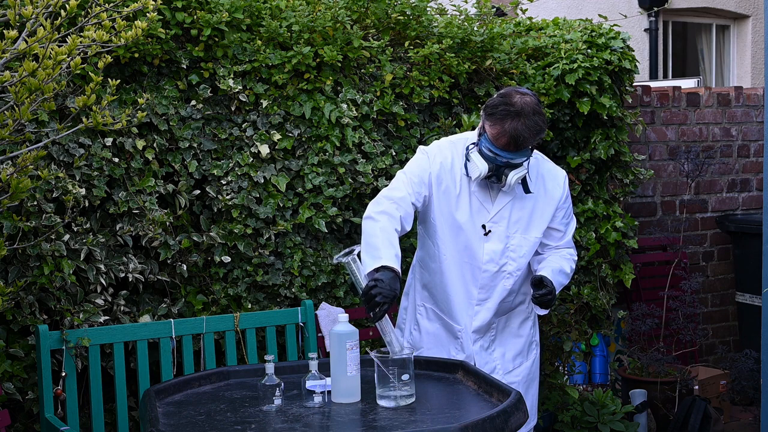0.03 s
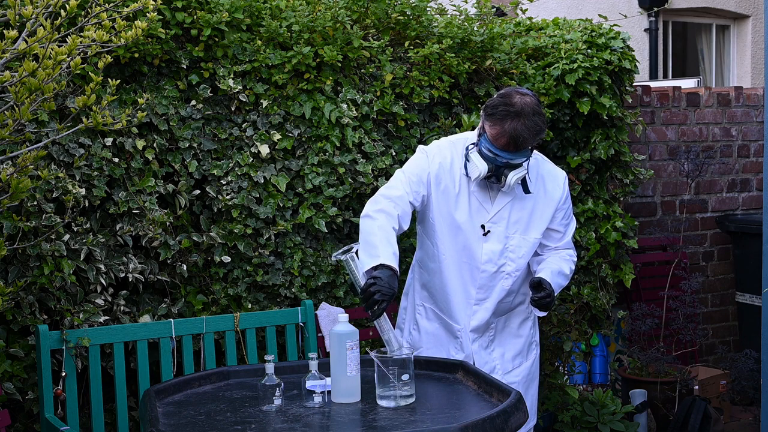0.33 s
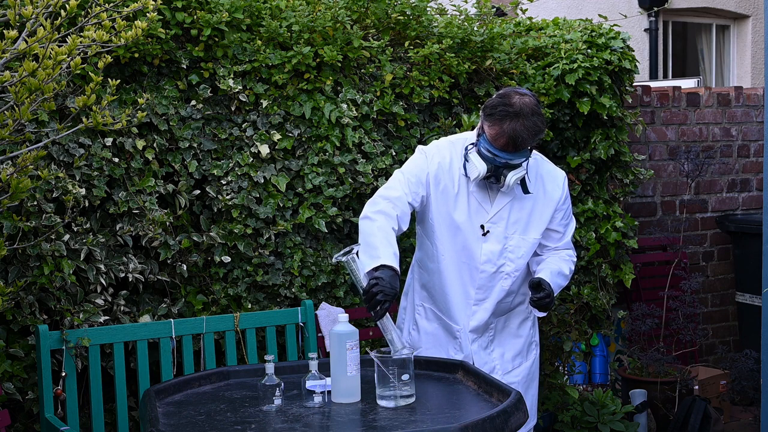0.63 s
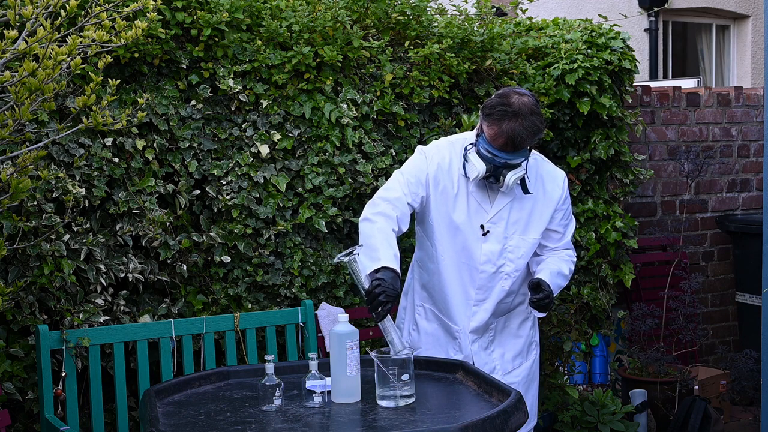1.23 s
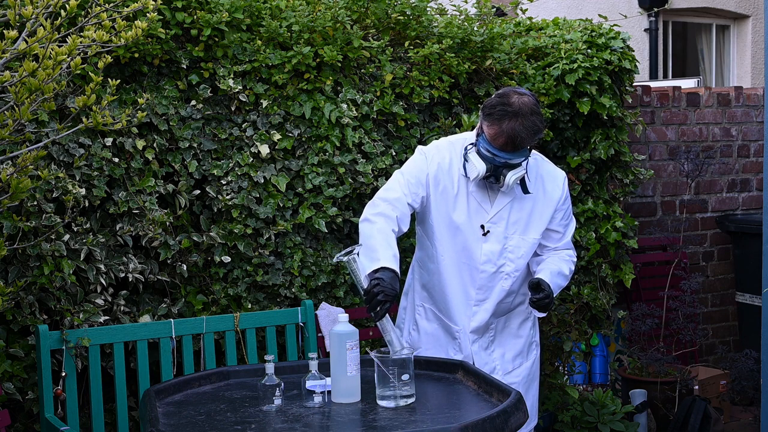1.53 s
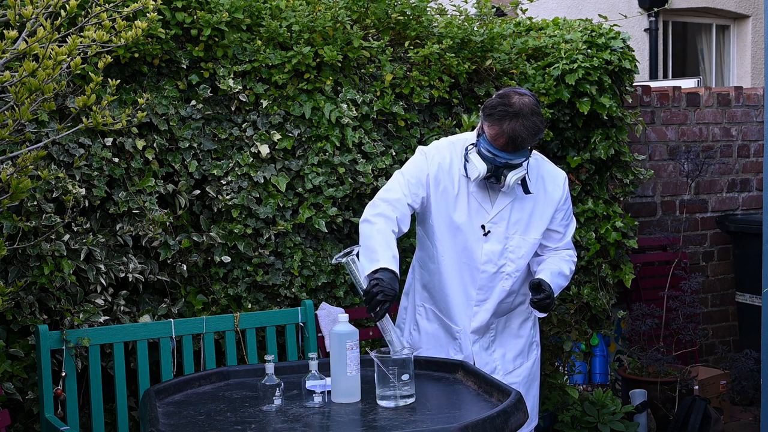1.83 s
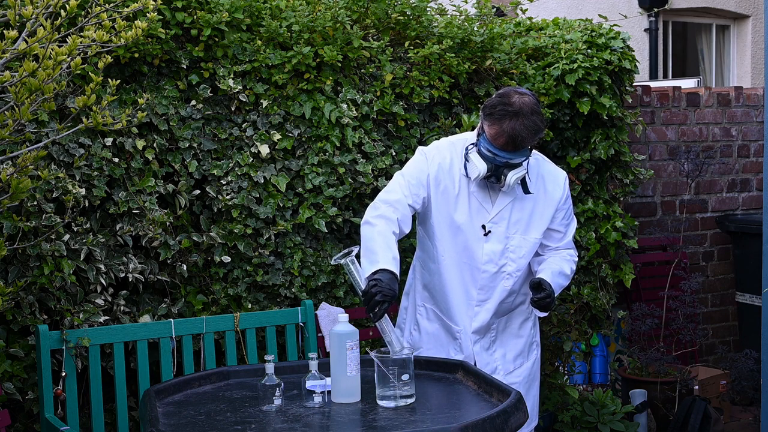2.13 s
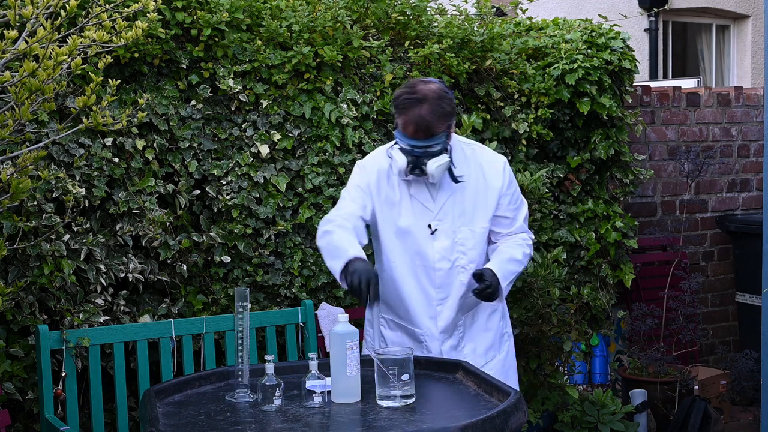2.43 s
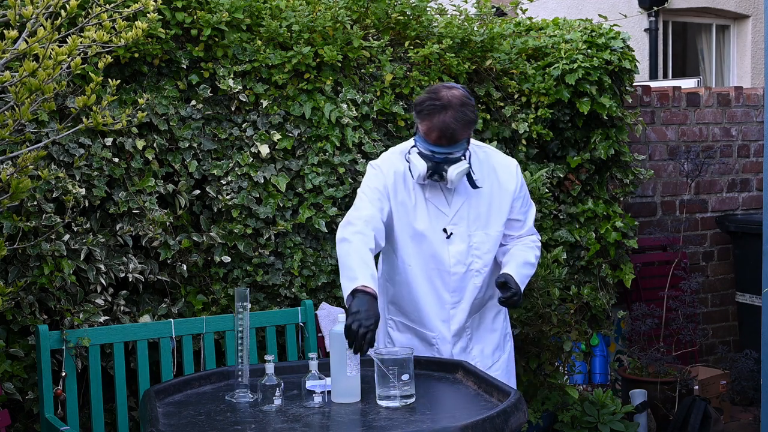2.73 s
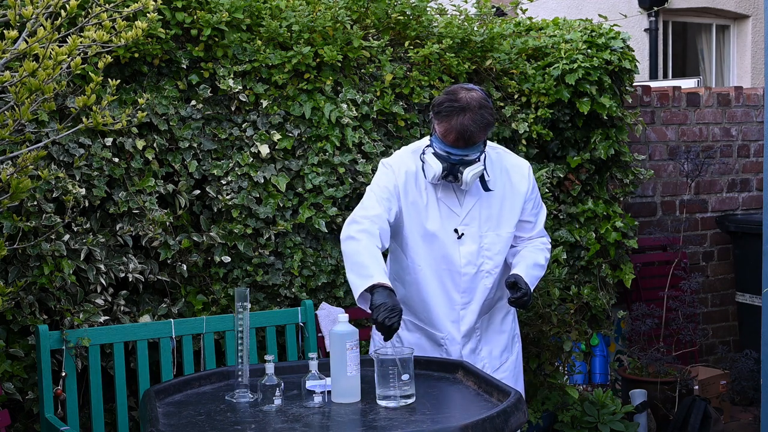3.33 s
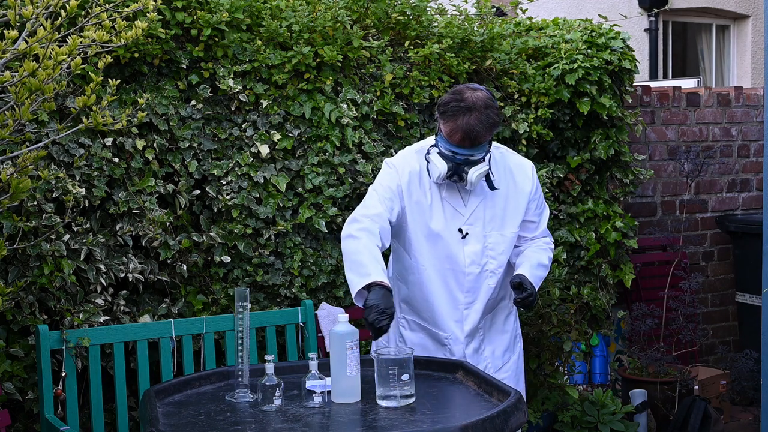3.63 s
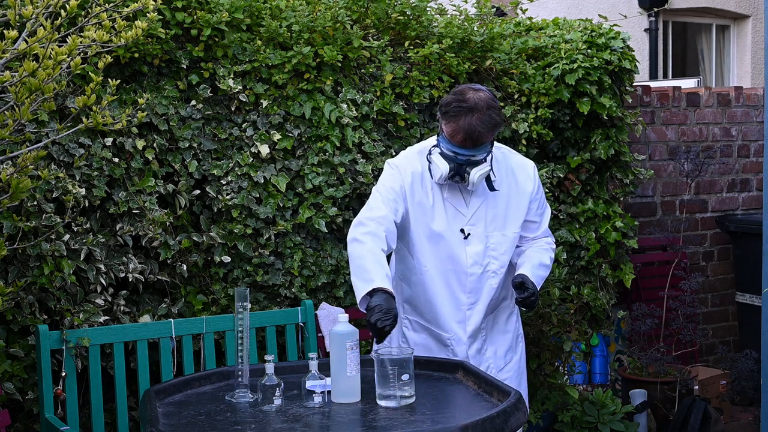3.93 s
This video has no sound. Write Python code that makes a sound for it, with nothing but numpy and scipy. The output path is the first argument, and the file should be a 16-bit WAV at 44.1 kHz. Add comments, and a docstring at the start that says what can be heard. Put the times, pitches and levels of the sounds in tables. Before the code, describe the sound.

A glass rod clinks against a beaker several times after faint coat rustling outdoors.

```python
"""A lab coat rustles close by and glassware ticks in a gloved hand, over the low rumble and hiss of a
quiet garden. After three seconds a glass rod, lowered into a beaker, clinks five times, mostly with a
bounce. Each impact sets both glasses in free vibration, their modes weighted by the point of contact.
Between blows the rod grazes the wall, and friction keeps both faintly ringing. Nearby surfaces scatter
the sound of the glass."""
import sys
import numpy as np
from scipy import signal
from scipy.fft import rfft, irfft
from scipy.io import wavfile
from scipy.ndimage import uniform_filter1d

SR = 44100
rng = np.random.default_rng(int(sys.argv[2]) if len(sys.argv) > 2 else 0)


def bounce(signal):
    """Save signal as a 16-bit WAV file at the path given by the first command-line argument."""
    frames = np.transpose(np.atleast_2d(signal))
    limited = np.clip(frames, -1, 1)
    pcm = np.round(limited * 32767).astype(np.int16)
    wavfile.write(sys.argv[1], SR, pcm)


N = 176400

# beaker modes, one per column; rows: pitch_hz, foot_db, wall_db, rim_db (places 0, 1, 2), t60_s
BEAKER_MODES = [
    [745, 1991, 2035, 3467, 3771, 4000, 4200, 4492, 4607, 5216, 6020, 6266, 6480, 6635, 6790, 8365, 10770,
     12215, 12420, 14560],
    [-62, -47, -48, -50, -29.5, -38, -38, -40, -35, -39, -33, -43, -31, -25, -46, -28, -60, -56, -52, -46],
    [-59, -45, -51, -43, -31, -35, -35, -45, -30.5, -54, -34, -43, -31, -24.5, -45, -39, -30, -34, -41, -34],
    [-62, -45, -51, -44, -52, -48, -46, -39, -46, -45, -46, -52, -46, -46, -52, -32, -40, -29, -38, -36],
    [1.8, .72, .15, .21, .175, .035, .035, .16, .125, .18, .04, .13, .03, .03, .12, .055, .07, .07, .06,
     .055],
]
# rod modes, one per column; rows: pitch_hz, tip_db, shaft_db (places 0, 1), t60_s
ROD_MODES = [
    [1529, 2955, 3185, 4518, 4620, 4678, 4930, 5080, 5221, 7090, 7400, 7685, 9522, 9718, 9800, 11322, 11420,
     11915, 12600, 13100, 13540, 14300],
    [-60, -44.5, -62, -43, -42, -40, -38, -44, -57, -45, -36, -45, -43, -34, -36, -54, -35, -43, -42, -44,
     -38, -35],
    [-57, -45, -62, -36, -54, -41, -42, -40, -43, -56, -52, -36, -30, -34, -42, -34, -34, -37, -54, -35,
     -40, -48],
    [.28, .175, .35, .13, .11, .125, .105, .04, .11, .07, .065, .05, .055, .04, .055, .06, .04, .06, .07,
     .025, .045, .045],
]
# points at which the colour of a contact is set: frequency_hz
COLOUR_HZ = [1500, 3000, 4700, 7000, 10000, 13500]
# impacts of rod on beaker: start_s, contact_s, beaker_place, rod_place, beaker_db, rod_db, crack_db,
# knock_db, then one colour_db for each of COLOUR_HZ
IMPACTS = [(3.0340, 0.0015, 1.8, 0, -17, -3, -7, -1, -4.5, 2, -6.5, -2.5, 3, -8.5),
           (3.2623, 0.0012, 0.75, 1, -9.5, -0.5, 0, 4.5, -8.5, 2, 1, 7, 7, 7),
           (3.2820, 0.0018, 0, 1, -17, -3.5, -9, -2, -9, 6, -5.5, -1, 5, -6),
           (3.2870, 0.0024, 0, 1, -17.5, -18, -5, -19, 6, -1.5, -2, 7, -4, -8),
           (3.6296, 0.0015, 0.11, 0, -24, -3.5, -8, -.5, 9, 1.5, 2.5, 7.5, -33, -24),
           (3.6349, 0.00064, 2.4, 0, -36, -19, -13, -5, -4, -5, 7, -4, -22, -23),
           (3.694, 0.0022, 1, .6, 1.5, -9.5, 6, 3.5, -2.5, 1, 1.5, 7, -3.5, -7.5),
           (3.8822, 0.00057, 2.3, .6, -11.5, -17.5, -7, -4, 2, -2, 4, 3, 4, 2),
           (3.8975, 0.0024, 2.1, .6, -15.5, -16, -13, -8, -6, -4, 6, 9, 1.5, 6)]
# dense, short overtones of the contact: frequency_hz, density_db
CRACK_SPECTRUM = [(300, -35), (1000, -25), (1600, -9.5), (2400, -5.5), (3200, 1.5), (4200, -15), (5500, -1),
                  (6600, 3.5), (10000, 0.5), (13500, 7.5), (15000, 3), (16500, -31)]
CRACK_DB, CRACK_T60_S = -30, 0.027
BITE_DB, BITE_T60_S = -24, 0.006  # the first hard instant of the crack
OVERTONE_DB, OVERTONE_T60_S, OVERTONE_SPREAD_DB = -57, 0.06, 4
OVERTONE_RANGE_HZ = (6800, 16000)
# dull knock passed on to the table: frequency_hz, density_db
KNOCK_SPECTRUM = [(100, -28), (350, -13), (550, 4.5), (750, -8), (1080, 2.5), (1400, -14), (3000, -9)]
KNOCK_DB, KNOCK_T60_S = -41.5, 0.04

# the rod catches on the wall: start_s, length_s, rasp_db, fizz_db
CATCHES = [(3.125, 0.023, -74.5, -80), (3.354, 0.039, -82, -81), (3.417, 0.012, -60.5, -62.5),
           (3.445, 0.056, -76.5, -80), (3.496, 0.0079, -67.5, -68), (3.512, .012, -75, -60),
           (3.538, 0.024, -79, -73.5), (3.588, 0.02, -63, -82), (3.612, 0.0079, -69.5, -66),
           (3.64, 0.055, -69, -67.5), (3.993, 0.027, -65, -70)]
# rasp of a catch: frequency_hz, density_db
RASP_SPECTRUM = [(1500, -26), (3000, -13), (3800, 0), (4650, 12), (5800, -9), (7400, 9), (8700, -10),
                 (10000, 5.5), (13000, -15), (15500, -22.5)]
# high fizz of a catch: frequency_hz, density_db
FIZZ_SPECTRUM = [(5000, -32), (9000, -5), (11500, -4), (12600, 3), (14000, -11.5), (15500, -18)]
# the rod drags round the wall: time_s, level_db
DRAG_LEVELS = [(3.28, -110), (3.35, -83), (3.43, -74), (3.52, -82.5), (3.6, -73), (3.68, -79), (3.75, -110)]
# sliding friction: frequency_hz, density_db
DRAG_SPECTRUM = [(1500, -5.5), (3700, -10), (4600, -1), (6000, -8), (15000, -14.5)]
GRAZE_GRAIN_DB, GRAZE_RING_DB = 3, -6.5

SCATTER_DB, SCATTER_T60_S = -15, 0.16
# stereo width of the clinks' tail, narrow in the mids and wide in the treble: frequency_hz, gain_db
TAIL_WIDTH = [(1000, -25), (2200, -32), (3500, -23), (4800, -1.5), (12000, 2)]
TAIL_WIDTH_DB = -24

# ticks of handled glassware: start_s, body_db, snap_db
TICKS = [(.166, -65, -67), (0.2647, -57, -69), (.563, -66, -80), (0.712, -71, -69), (0.9716, -55, -62),
         (1.872, -54, -72), (2.845, -61, -63)]
# hollow body of a tick: frequency_hz, density_db
TICK_BODY_SPECTRUM = [(200, 0), (600, 0), (1100, 5), (1900, -5), (2700, -12), (4000, -15), (9000, -32)]
# thin snap of a tick: frequency_hz, density_db
TICK_SNAP_SPECTRUM = [(1000, -14), (2600, 1), (4000, -1), (5500, -4), (7500, -13), (15000, -28)]
TICK_S = 0.0048

# creases of coat and glove: start_s, length_s, crease_db, thump_db
CREASES = [(0.062, 0.059, -65.5, -81), (0.204, 0.027, -68.5, -68), (0.225, 0.031, -66.5, -65),
           (0.26, 0.0062, -72, -56), (0.549, 0.049, -64.5, -63.5), (0.864, 0.029, -67, -64),
           (1.009, 0.036, -70, -65), (1.151, 0.025, -62, -81), (1.278, 0.036, -66, -57),
           (1.591, 0.013, -70, -84), (1.85, 0.021, -67, -66), (2.142, 0.067, -68.5, -70),
           (2.332, 0.028, -67, -65), (2.841, 0.016, -62, -55)]
# creasing cloth: frequency_hz, density_db
CREASE_SPECTRUM = [(100, -8), (400, 1.5), (900, -0.5), (1450, 1), (2100, -3.5), (3000, -10.5),
                   (5000, -18.5), (9000, -26), (15000, -32)]
# soft thump of cloth: frequency_hz, density_db
THUMP_SPECTRUM = [(50, -17), (110, -5), (165, 2.5), (300, -5.5), (800, -23), (3000, -39)]
# the sleeve swishes as the arm moves: time_s, level_db
SLEEVE_LEVELS = [(2.407, -91), (2.412, -55.5), (2.53, -55.5), (2.6, -58), (2.665, -57), (2.7, -64),
                 (2.8, -68.5), (3.0, -76)]
# swish of the sleeve: frequency_hz, density_db
SLEEVE_SPECTRUM = [(40, -14), (130, -4.5), (330, -5), (480, -1), (850, 0), (1150, -10), (2500, -13),
                   (4500, -18), (10000, -27.5), (12500, -29), (16000, -46)]
CLOTH_GRAIN_DB = 2

# soft rush in the background: time_s, level_db
RUSH_LEVELS = [(2.0, -90), (2.4, -82), (2.7, -66), (2.95, -77), (3.15, -67.5), (3.3, -65.5), (3.55, -65.5),
               (3.7, -74), (3.85, -74.5), (4.0, -63.5)]
# low-mid colour of that rush: frequency_hz, density_db
RUSH_SPECTRUM = [(150, -30.5), (400, 5), (800, 1.5), (1300, -14), (3000, -12), (8000, -30)]
# outdoor rumble and hiss: frequency_hz, density_db
AIR_SPECTRUM = [(12, -28.5), (20, -6), (37, -5), (68, -3.5), (142, -3), (204, -2.5), (234, -3.5), (472, -7),
                (542, -9.5), (590, -10), (738, -9.5), (1370, -17), (2750, -24), (12100, -32),
                (16000, -53.5)]
# stereo width of the rumble and hiss: frequency_hz, density_db
AIR_SIDE_SPECTRUM = [(40, 4), (170, -11), (900, -9.5), (1500, -2.5), (7500, -0.5), (11000, -27),
                     (16000, -20)]
AIR_DB, AIR_SIDE_DB, AIR_WANDER_DB = -63.5, -86.5, 0.6

SIDES = np.array([[1], [-1]])  # sign of a difference signal, left and right
MIC_LAG_S, CUTOFF_HZ = 5e-6, 16100


def clinks(t):
    """Impact excitation: each blow rings beaker and rod, cracks at the contact and knocks the table."""
    out = np.zeros(N)
    for start, contact_s, beaker_place, rod_place, *levels in IMPACTS:
        beaker_db, rod_db, crack_db, knock_db, *colour = levels
        first = int(start * SR)
        age = t[:N - first]
        beaker = undb(beaker_db) * ring(age, BEAKER_MODES, beaker_place, colour)
        rod = undb(rod_db) * ring(age, ROD_MODES, rod_place, colour)
        decay = undb(CRACK_DB) * fade(age, CRACK_T60_S) + undb(BITE_DB) * fade(age, BITE_T60_S)
        burst = decay * tint(noise(CRACK_SPECTRUM), COLOUR_HZ, colour)[:len(age)]
        crack = undb(crack_db) * (burst + ring(age, overtones(count=50), 0, colour))
        knock = undb(KNOCK_DB + knock_db) * fade(age, KNOCK_T60_S) * noise(KNOCK_SPECTRUM)[:len(age)]
        onset = np.minimum(age / contact_s, 1)
        out[first:] += (beaker + rod + crack + knock) * onset
    return out


def ring(t, modes, place, colour):
    """Modal superposition: damped sinusoids add, weighted by the place and colour of the contact."""
    out = np.zeros(len(t))
    for (hz, *levels, t60), phase in zip(zip(*modes), rng.random(len(modes[0]))):
        age = t[:int(2 * t60 * SR)]
        place_db = np.interp(place, np.arange(len(levels)), levels)
        colour_db = np.interp(np.log(hz), np.log(COLOUR_HZ), colour)
        envelope = undb(place_db + colour_db) * fade(age, t60)
        out[:len(age)] += envelope * np.sin(2 * np.pi * (hz * age + phase))
    return out


def overtones(count):
    """High modal density: weak, short modes lie among the main ones, drawn at random for each blow."""
    hz = rng.uniform(*OVERTONE_RANGE_HZ, count)
    db = OVERTONE_DB + np.interp(hz, *np.array(CRACK_SPECTRUM).T)
    db += OVERTONE_SPREAD_DB * rng.standard_normal(count)
    t60 = OVERTONE_T60_S * 2 ** rng.uniform(-0.5, 0.31, count)
    return hz, db, t60


def grazes(t):
    """Forced vibration: friction drives both glasses, and rasps and fizzes where the rod catches."""
    start, length, rasp_db, fizz_db = np.array(CATCHES).T
    grain = undb(GRAZE_GRAIN_DB * wander(rate_hz=600))
    rasp = swells(t, start, length, rasp_db) * noise(RASP_SPECTRUM) * grain
    fizz = swells(t, start, length, fizz_db) * noise(FIZZ_SPECTRUM) * grain
    drag = curve(t, DRAG_LEVELS) * noise(DRAG_SPECTRUM) * grain
    flat = np.zeros(len(COLOUR_HZ))
    response = ring(t, BEAKER_MODES, 0, flat) + ring(t, ROD_MODES, 1, flat)  # foot and shaft
    friction = undb(GRAZE_RING_DB) * rasp + drag
    ringing = signal.fftconvolve(friction, response / np.linalg.norm(response))[:N]
    return rasp + fizz + ringing


def scatter(x, t):
    """Diffuse reflection: table, coat and hedge return a short, decaying spray of echoes."""
    echoes = (rng.standard_normal(N) * fade(t, SCATTER_T60_S))[:SR // 2]
    return signal.fftconvolve(x, echoes / np.linalg.norm(echoes))[:N]


def ticks(t):
    """Brief transients are broadband: handled glassware ticks with a hollow body and a thin snap."""
    start, body_db, snap_db = np.array(TICKS).T
    length = np.full(len(start), TICK_S)
    body = swells(t, start, length, body_db) * noise(TICK_BODY_SPECTRUM)
    snap = swells(t, start, length, snap_db) * noise(TICK_SNAP_SPECTRUM)
    return body + snap


def coat(t):
    """Buckling and friction: cloth creases, at times with a soft thump, and the sleeve swishes once."""
    start, length, crease_db, thump_db = np.array(CREASES).T
    creases = swells(t, start, length, crease_db) * noise(CREASE_SPECTRUM)
    swish = curve(t, SLEEVE_LEVELS) * noise(SLEEVE_SPECTRUM)
    grain = undb(CLOTH_GRAIN_DB * wander(rate_hz=350))
    thumps = swells(t, start, length, thump_db) * noise(THUMP_SPECTRUM)
    return (creases + swish) * grain + thumps


def outdoors(t):
    """Ambient noise, highly correlated left and right: rumble, hiss and a soft rush that swells later."""
    air = undb(AIR_DB + AIR_WANDER_DB * wander(rate_hz=12)) * noise(AIR_SPECTRUM)
    rush = curve(t, RUSH_LEVELS) * noise(RUSH_SPECTRUM)
    width = undb(AIR_SIDE_DB) * noise(AIR_SIDE_SPECTRUM)
    return air + rush + width * SIDES


def undb(db):
    """Amplitude ratio of a level in decibels."""
    return 10 ** (np.asarray(db) / 20)


def noise(spectrum):
    """Filtered white noise of rms 1; the spectrum sets only its shape."""
    x = tint(rng.standard_normal(N), *np.array(spectrum).T)
    return x / x.std()


def tint(x, hz, db):
    """Zero-phase filtering, with the gain interpolated over log frequency."""
    bin_hz = np.maximum(np.fft.rfftfreq(N, 1 / SR), 1)
    gain = undb(np.interp(np.log(bin_hz), np.log(hz), db))
    return irfft(rfft(x) * gain, N)


def wander(rate_hz):
    """Random modulation: smoothed steps with a standard deviation of 1."""
    hold = max(int(SR / rate_hz), 1)
    steps = np.repeat(rng.standard_normal(N // hold + 1), hold)
    x = uniform_filter1d(steps, hold)[:N]
    return x / x.std()


def fade(t, t60):
    """Exponential damping: the level falls 60 dB in t60 seconds."""
    return np.exp(-np.log(1000) * t / t60)


def curve(t, points):
    """Amplitude envelope through points of time_s, level_db."""
    return undb(np.interp(t, *np.array(points).T))


def swells(t, starts_s, lengths_s, peaks_db):
    """Critically damped pulses: each rises quickly and falls more softly."""
    out = np.zeros(N)
    for start, length, db in zip(starts_s, lengths_s, peaks_db):
        rise_s = length / np.e
        progress = np.maximum(t - start, 0) / rise_s
        out += undb(db) * progress * np.exp(1 - np.minimum(progress, 100))
    return out


def scene():
    """Superposition in stereo: glass just off axis, its tail wide in the treble, the rest central."""
    t = np.arange(N) / SR
    glass = clinks(t) + grazes(t)
    # the two sides of the microphone each take half the lag, in opposite directions
    lag = np.exp(-1j * np.pi * np.fft.rfftfreq(N, 1 / SR) * MIC_LAG_S * SIDES)
    direct = irfft(rfft(glass) * lag, N)
    width = undb(TAIL_WIDTH_DB) * tint(scatter(glass, t), *np.array(TAIL_WIDTH).T)
    tail = undb(SCATTER_DB) * scatter(glass, t) + width * SIDES
    return direct + tail + ticks(t) + coat(t) + outdoors(t)


def record(dry):
    """Band limiting: a steep low-pass filter removes the highest treble."""
    return signal.sosfilt(signal.ellip(8, 0.2, 70, CUTOFF_HZ, fs=SR, output="sos"), dry)


dry = scene()
out = record(dry)
bounce(out)
```